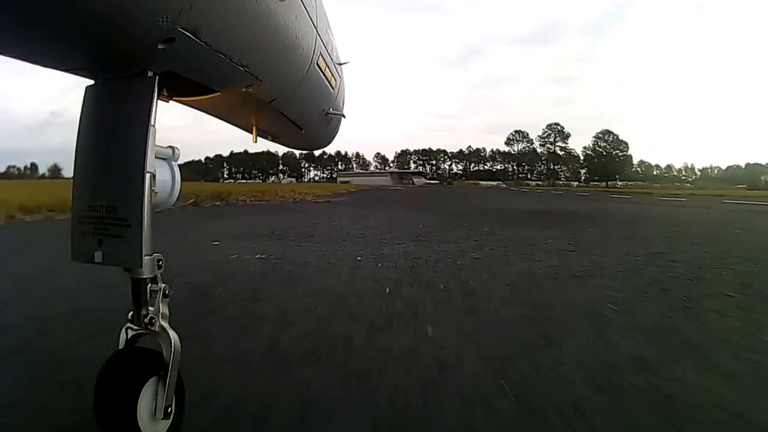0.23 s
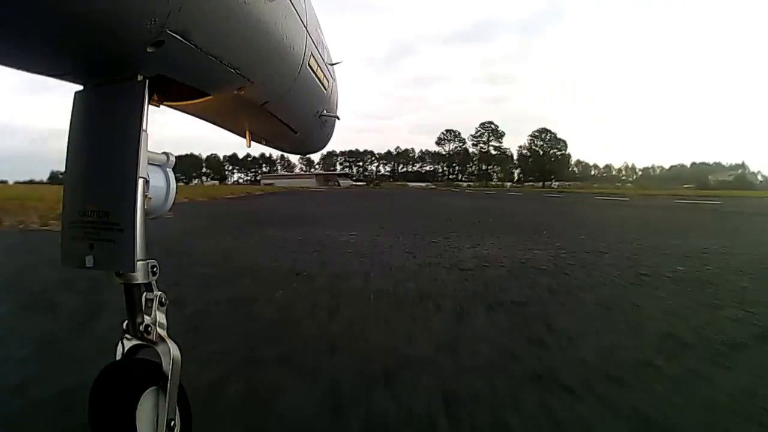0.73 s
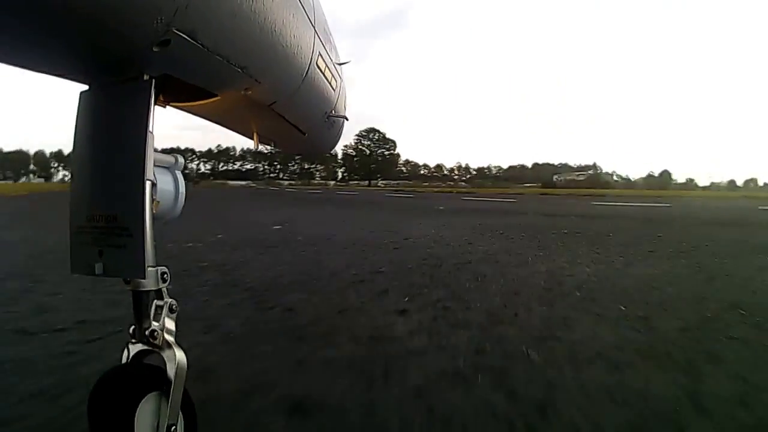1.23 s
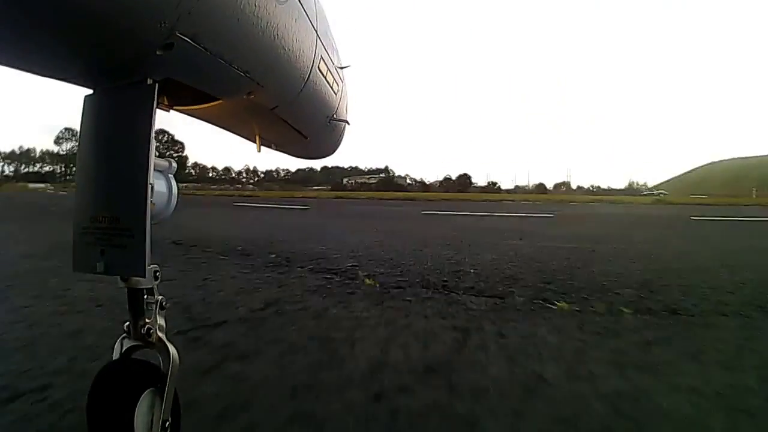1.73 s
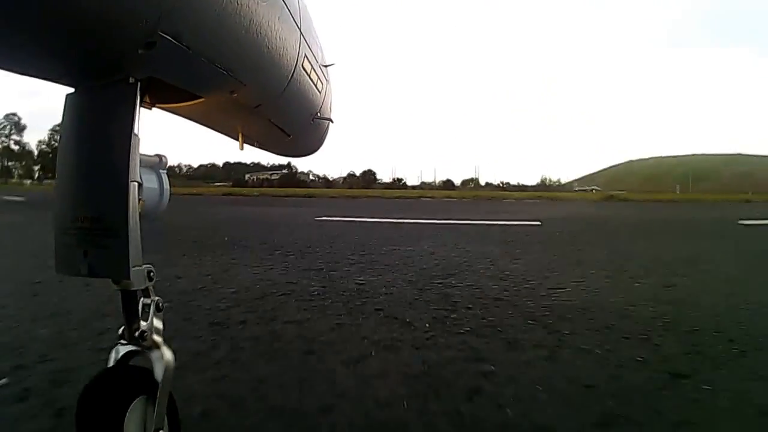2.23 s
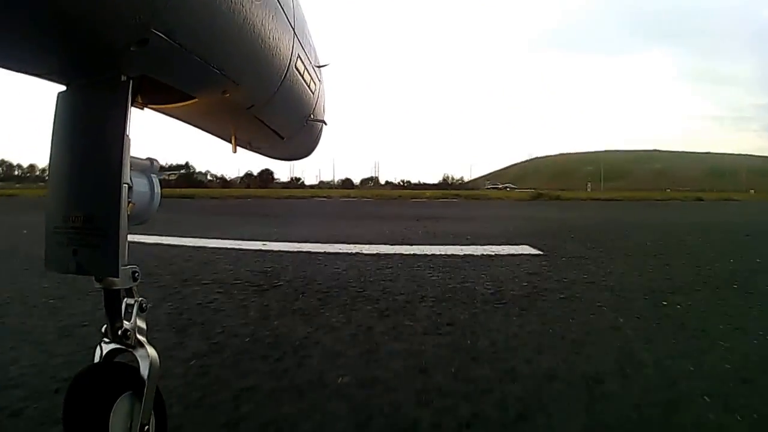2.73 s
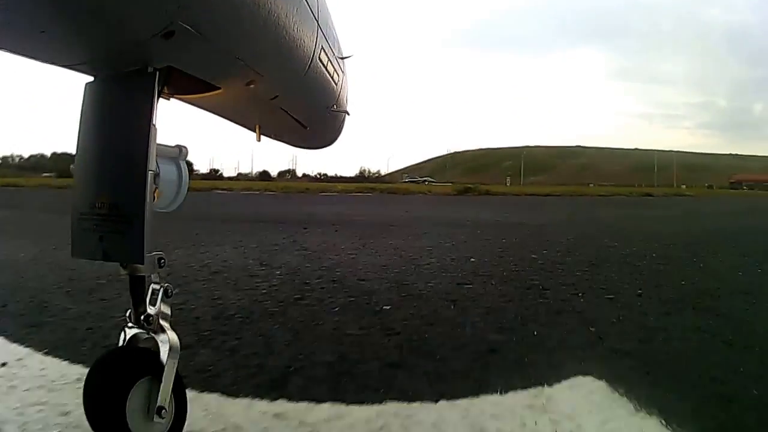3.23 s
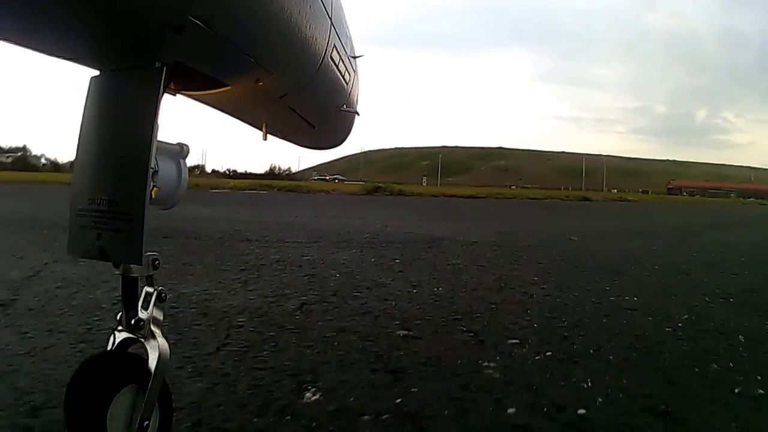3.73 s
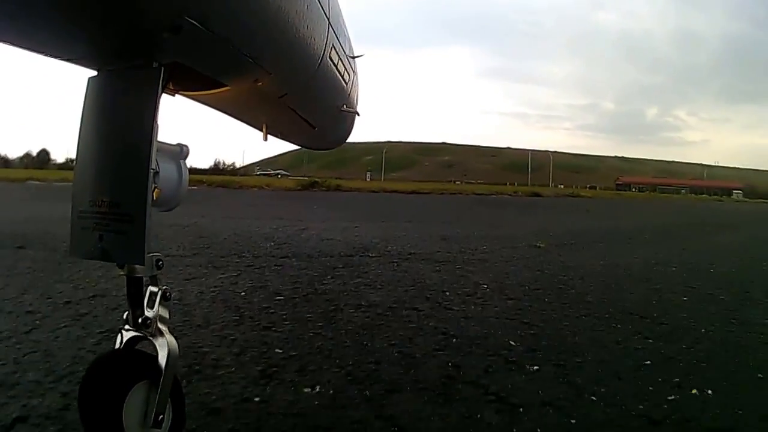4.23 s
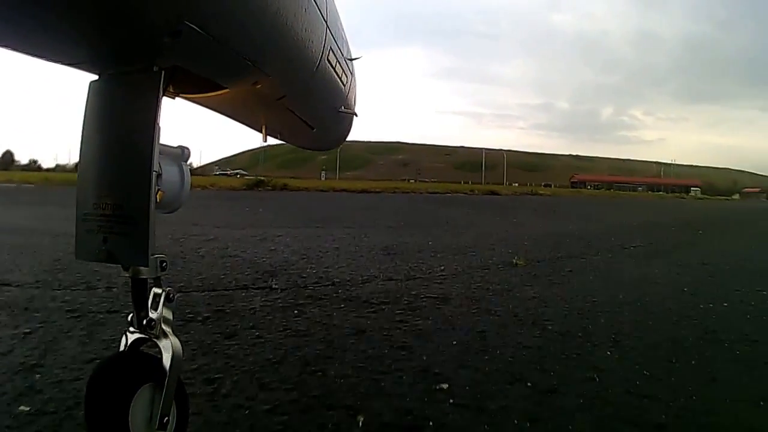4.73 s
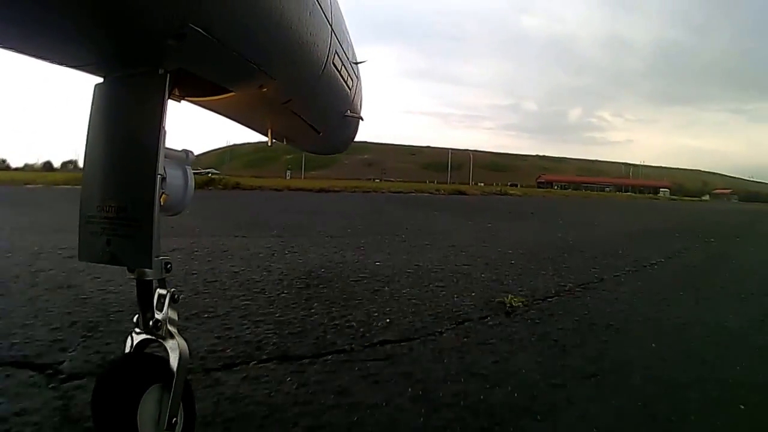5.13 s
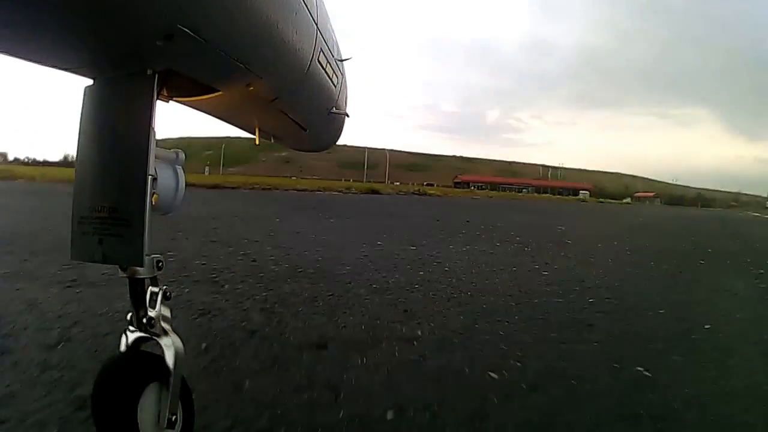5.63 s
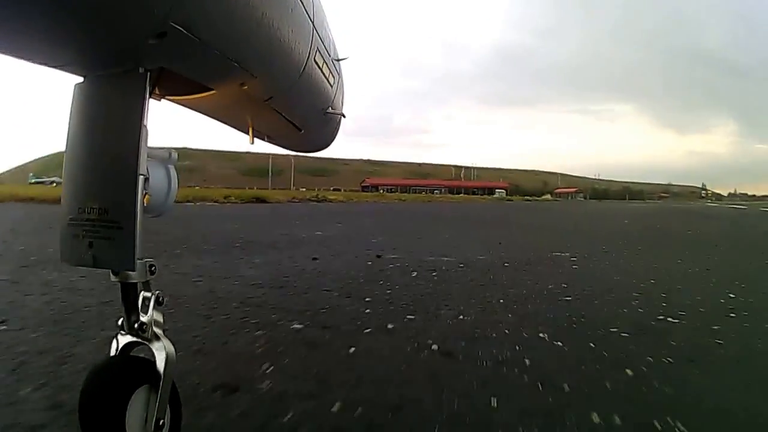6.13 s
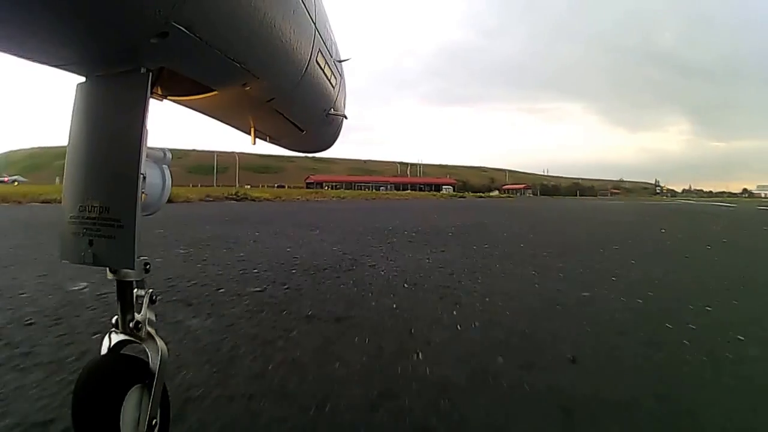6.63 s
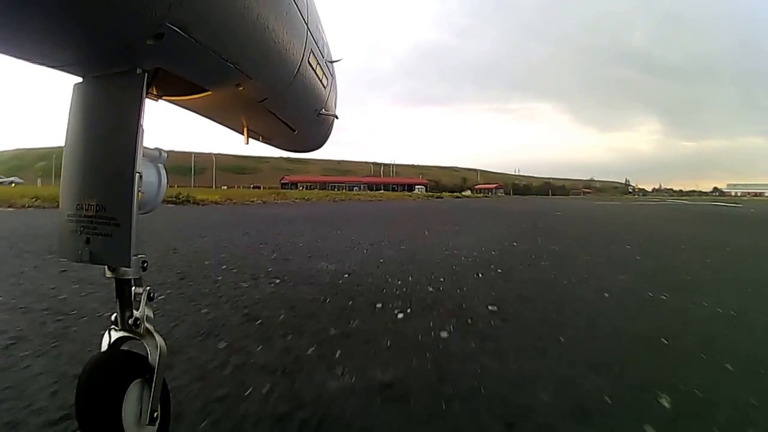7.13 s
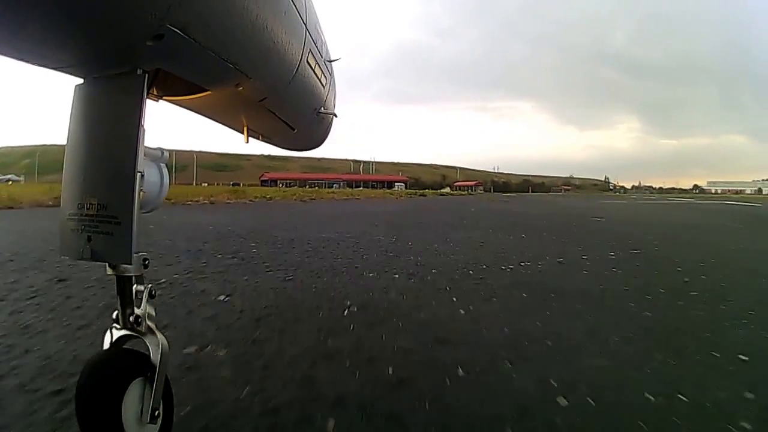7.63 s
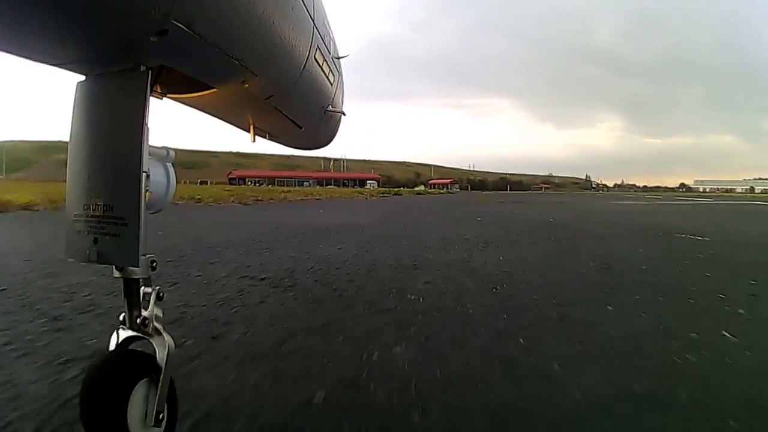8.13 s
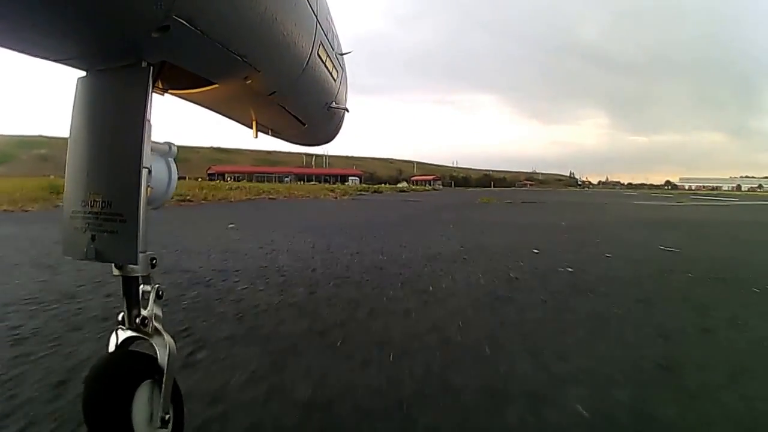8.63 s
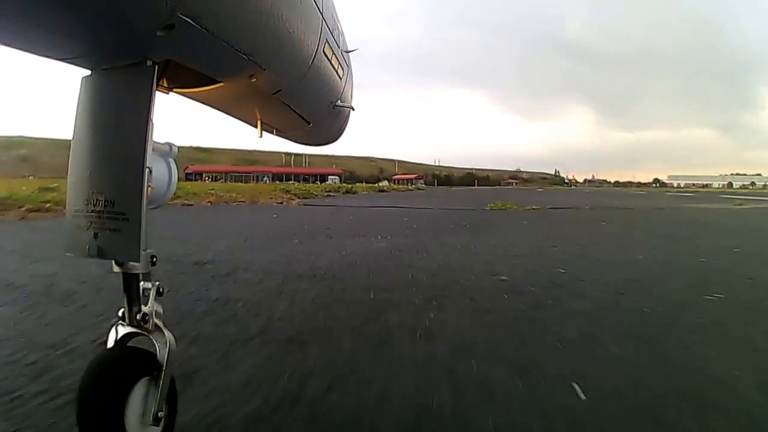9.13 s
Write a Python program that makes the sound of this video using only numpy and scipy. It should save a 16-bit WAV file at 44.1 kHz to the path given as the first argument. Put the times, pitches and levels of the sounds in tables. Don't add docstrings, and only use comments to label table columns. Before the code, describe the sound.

From 0 s a model jet coasts on rough asphalt, heard from a small microphone under its airframe: low tyre drumming, gritty chatter, loose parts chinking, and knocks around 0.5, 0.9, 1.2 and 1.6 s. It weakens after 2 s, then a seam strikes the wheels in a hard cluster at about 2.6 s. Rolling fades to near quiet by 4 s with a few small ticks. At 4.15-4.3 s the motors catch with faint rings and a thud, and two ducted fans jump up in roar, hiss and a shrill whistle near 2.4 kHz. They step higher at 5.2 and 5.8 s, loudest around 6 s, then drop steeply to a faint whine near 6.5 s. From 6.7 s they climb again in steps, settling by 7.8 s into a loud, beating twin whistle with low buffeting until just past 9 s. Sound is dry, muffled above 4 kHz, clipped on peaks.

```python
import sys
import numpy as np
from scipy import signal
from scipy.fft import rfft, irfft, next_fast_len
from scipy.io import wavfile
from scipy.ndimage import map_coordinates

SR = 44100
rng = np.random.default_rng(int(sys.argv[2]) if len(sys.argv) > 2 else 0)


def to_wav(s):
    ch = np.atleast_2d(s).T
    pcm = np.round(np.clip(ch, -1, 1) * 32767)
    wavfile.write(sys.argv[1], SR, pcm.astype(np.int16))


def decibels_to_gain(level_db):
    exponent = np.asarray(level_db, float) / 20
    return 10 ** exponent


N = 413216

# (time [s], shaft speed [Hz])
THROTTLE_SPEED = [(4.2, 80), (4.35, 152), (4.49, 173.5), (5.03, 175), (5.34, 237), (5.74, 237.4),
                  (5.9, 252), (6.235, 251), (6.535, 135), (6.63, 150.5), (6.87, 155.5), (6.98, 166),
                  (7.09, 167.5), (7.28, 189), (7.6, 191), (7.73, 205.5), (8.78, 206.5), (8.95, 212.5)]
# (level at full speed [dB], slope [dB per log speed], start [s], rise [s])
DUCT_LAYERS = [
    (-17, 20, 4.31, .17),
    (-23, 23, 4.27, 0.043),
    (-26, 23.5, 4.27, 0.11),
]


def unit(x):
    return x / np.sqrt(np.mean(x ** 2) + 1e-20)


def curves(rows, before=None):
    times, *columns = np.transpose(rows)
    return [np.interp(np.arange(N) / SR, times, column, left=before) for column in columns]


def wobble(rate):
    knots = rng.standard_normal(int(N * rate / SR) + 4)
    return map_coordinates(knots, [np.arange(N) * rate / SR])


def filtered(x, response):
    m = next_fast_len(N + 8192)
    return irfft(rfft(x, m) * response(np.fft.rfftfreq(m, 1 / SR)), m)[:N]


def rush(spectrum, grain_db=0., rate=300):
    f, db = np.transpose(spectrum)
    lumps = rng.standard_normal(N) * decibels_to_gain(grain_db * wobble(rate))

    def colour(hz):
        return decibels_to_gain(np.interp(np.log(hz + 1), np.log(f), db, -120, -120))

    return unit(filtered(lumps, colour))


def tone(hz):
    return np.sqrt(2) * np.sin(2 * np.pi * np.cumsum(hz) / SR)


def rings(events, attack, rough):
    out = np.zeros(N + SR)
    t = np.arange(SR // 5) / SR
    for start, db, hz, t60 in events:
        envelope = decibels_to_gain(db - 60 * t / t60) * (1 - np.exp(-t / attack))
        out[round(start * SR):][:len(t)] += envelope * np.sin(2 * np.pi * hz * t)
    return out[:N] * (1 - rough + rough * wobble(700))


def lag(x, seconds):
    k = np.exp(-1 / (seconds * SR))
    return signal.lfilter([1 - k], [1, -k], x - x[0]) + x[0]


def law(points, hz):
    f, value = np.transpose(points)
    return np.interp(np.log(hz), np.log(f), value)


def shaft():
    return lag(curves(THROTTLE_SPEED, 70)[0], .05)


def rumble(tyre_db):
    # (frequency [Hz], density [dB/Hz])
    deep_spectrum = [(15, -12.5), (30, -7), (55, -2.5), (85, 1), (120, -4.5), (170, -6), (220, -22)]
    breakaway_hz = 176
    gained = np.cumsum(shaft() ** 2 - breakaway_hz ** 2)
    lowest = gained.argmin()
    index = np.arange(N)
    floor = np.minimum.accumulate(gained) * (index <= lowest) + gained.min() * (index > lowest)
    pace = gained - floor
    buffet = decibels_to_gain(-32 + 15 * np.log(pace / pace.max() + 1e-4))
    rolling = decibels_to_gain(-32 + .45 * tyre_db)
    return np.hypot(rolling, buffet) * decibels_to_gain(4.0 * wobble(11)) * rush(deep_spectrum)


def wheels():
    # (time [s], tyre level [dB])
    roll_level = [(0, -28.5), (.35, -32.5), (.75, -34.5), (1.9, -35.5), (2.2, -41), (2.42, -41),
                  (2.57, -37.5), (2.92, -46), (4, -54), (4.2, -52.5)]
    # (frequency [Hz], density [dB/Hz])
    tyre_spectrum = [(59, -40), (100, -2.5), (204, 0.5), (291, 1.5), (378, 0), (481, 0), (589, -5.5),
                     (680, -1.5), (1000, -21.5), (1300, -36), (2200, -120)]
    grit_spectrum = [(530, -34.5), (900, 0), (985, -7.5), (1200, -4), (1310, -6), (1440, -3), (1610, -7.5),
                     (1780, -3), (2210, -4), (2800, -16), (3640, -45), (6160, -120)]
    rattle_spectrum = [(1530, -30), (2600, -1.5), (3060, -4), (3370, 0.5), (3870, 1), (4070, -7.5),
                       (4200, -15.5), (4300, -28), (5590, -57.5), (9460, -120)]
    # (time [s], peak level [dB], frequency [Hz], t60 [s])
    chinks = [(0.3824, -19.5, 3800, 0.046), (0.4453, -26, 3700, 0.033), (0.4922, -31, 3720, 0.05),
              (0.5925, -35, 3480, 0.056), (0.7212, -32, 3550, 0.045), (0.9167, -28, 3590, 0.093),
              (0.9397, -15.5, 3630, 0.029), (1.0959, -35, 3780, 0.038), (1.3412, -28.5, 3600, 0.054),
              (1.456, -27, 3660, 0.041), (1.6545, -27.5, 3760, 0.057), (1.6694, -33, 3870, 0.05),
              (1.735, -35, 3030, 0.046), (1.9608, -37, 3440, 0.043), (2.3919, -37, 3770, 0.071),
              (2.5675, -39, 3500, 0.063), (3.499, -44, 3780, 0.046), (4.0811, -52, 3790, 0.045)]
    tyre_db, = curves(roll_level)
    jolt = np.abs(wobble(70)) ** 1.82
    tyre = decibels_to_gain(tyre_db + 0.47 * jolt) * rush(tyre_spectrum, 1.3, 60)
    grit = decibels_to_gain(tyre_db - 10.5 + 1.7 * jolt) * rush(grit_spectrum, 0.97, 150)
    rattle = decibels_to_gain(tyre_db - 20.5 + 1.9 * jolt) * rush(rattle_spectrum, 1.9, 120)
    return tyre + grit + rattle + rumble(tyre_db) + rings(chinks, 0.00073, 0.41)


def bumps():
    # (time [s], peak level [dB], crack level [dB])
    impacts = [(0.126, -25, -16), (0.245, -35, -18), (0.541, -13, -11), (0.939, -24, -1), (1.088, -33, -16),
               (1.212, -24, -2), (1.608, -26, -21), (2.439, -32, -1), (2.561, -16, -19), (2.581, -5, -4),
               (2.59, -5, -26), (2.608, -17, -26), (2.623, -17, -10), (2.649, -15.5, -4.5),
               (2.659, -19, -9), (2.908, -28, -5), (3.103, -34.5, 0), (3.498, -30.5, -8), (3.685, -37, 0)]
    # (frequency [Hz], width [Hz], level [dB])
    frame_modes = [(45, 44, 0.5), (90, 86, 3), (211, 220, 2.5), (355, 120, 3.5), (442, 50, 4.5),
                   (860, 43, -0.5)]
    # (frequency [Hz], density [dB/Hz])
    leg_spectrum = [(900, -22), (1250, 7), (1450, -18), (1650, 8), (1900, -6), (2350, 7.5), (2600, -14),
                    (3000, -14), (3600, -11.5), (4200, -32)]
    blows, cracks = np.zeros(N), np.zeros(N + SR)
    t = np.arange(SR // 10) / SR
    crack_t60 = .04
    for start, db, crack_db in impacts:
        blows[round(start * SR)] = decibels_to_gain(db + 31.5)
        decay = decibels_to_gain(db + crack_db - 3.0 - 60 * t / crack_t60)
        cracks[round(start * SR):][:len(t)] += decay * (1 - np.exp(-t / 0.0049))

    def knock(f):
        modes = 0
        for k, (centre, width, db) in enumerate(frame_modes):
            modes = modes + (-1) ** k * decibels_to_gain(db) * 1j * f * width / (centre ** 2 - f ** 2 + 1j * f * width)
        soft_tyre = 1 / (1 + 1j * f / 1100) ** 2
        return modes * soft_tyre

    return filtered(blows, knock) + cracks[:N] * rush(leg_spectrum)


def rotor():
    # (frequency [Hz], level [dB])
    blade_response = [(900, -60), (1460, -40), (1800, -36), (2050, -30.5), (2380, -30), (2520, -42.5),
                      (2800, -26), (3030, -22.5)]
    # (shaft speed [Hz], level [dB])
    imbalance = [(115, -81.5), (174, -54), (190, -39.5), (213, -38), (237, -30), (252, -27.5)]
    # (multiple of shaft speed [1], level at full speed [dB], slope [dB per log speed])
    shaft_orders = [
        (2, -33.5, 19),
        (6, -38, 26.5),
    ]
    blades = 12
    steady = shaft()
    speed = steady * (1 + .0024 * wobble(40))
    blade_db = law(blade_response, blades * steady) + 2.1 * wobble(22) + 3.5 * wobble(9.1)
    lines = decibels_to_gain(blade_db) * tone(blades * speed)
    push_db = 0.0135 * np.abs(np.gradient(steady) * SR)
    shake_db = law(imbalance, steady) + push_db
    lines += decibels_to_gain(shake_db + 1.2 * wobble(6.4)) * tone(speed)
    t = np.arange(N) / SR
    loaded = np.clip((t - DUCT_LAYERS[0][2]) / .4, 0, 1)
    for multiple, db, slope in shaft_orders:
        order_db = db + slope * np.log(speed / speed.max()) + 3.3 * wobble(12)
        lines += loaded * decibels_to_gain(order_db) * tone(multiple * speed)
    running = np.arange(N) > THROTTLE_SPEED[0][0] * SR
    return running * lines


def duct_noise():
    # (frequency [Hz], density [dB/Hz])
    roar_spectrum = [(150, -41), (215, -14), (270, -10), (340, 0), (400, 0), (500, -1.5), (590, -7.5),
                     (650, -15), (700, -24.5), (740, -43.5)]
    rush_spectrum = [(740, -31.5), (800, -7), (860, 2), (910, 1), (1070, -7.5), (1240, -1.5), (1580, -7),
                     (1760, 1), (1950, -2.5), (1990, -34.5)]
    bridge_spectrum = [(1950, 0.0), (2500, 1.5), (2850, -10.0)]
    hiss_spectrum = [(1620, -28), (2750, -4.5), (2950, -9.5), (3160, -10), (3690, -4.5), (3880, -2.5),
                     (4060, -9.5), (4300, -16.5), (5590, -49.5), (9460, -120)]
    wash_spectrum = [(90, -24), (140, -7.5), (210, 0), (300, -4), (600, -1.5), (740, -2.5), (840, -12)]
    t, speed = np.arange(N) / SR, shaft()
    power = np.log(speed / 252)
    levels = []
    for db, slope, start, rise in DUCT_LAYERS:
        onset = np.clip((t - start) / rise, 1e-6, 1) ** 2
        levels.append(db + slope * power + 20 * np.log10(onset))
    roar_db, rush_db, hiss_db = levels
    idle_db = -14 / (1 + (speed / 177) ** 60)
    wash_onset = np.clip((t - DUCT_LAYERS[0][2]) / .35, 1e-6, 1)
    wash_db = -33.5 + 16 * power + idle_db + 20 * np.log10(wash_onset)
    air = decibels_to_gain(roar_db) * rush(roar_spectrum, 1.0, 40)
    air += decibels_to_gain(rush_db + 2.0) * rush(rush_spectrum, 1.4)
    air += decibels_to_gain(rush_db + 1.5) * rush(bridge_spectrum)
    air += decibels_to_gain(hiss_db + 2.0) * rush(hiss_spectrum, 0.97)
    air += decibels_to_gain(wash_db + 7.5) * rush(wash_spectrum)
    return decibels_to_gain(0.43 * wobble(14)) * air


def whistle(hz, db, waver_hz, flutter_db, skirt_db):
    core = decibels_to_gain(flutter_db * wobble(40)) * tone(hz + waver_hz * wobble(45))
    turbulence = filtered(rng.standard_normal(N), lambda f: 1 / (1 + 1j * f / 45) / (1 + 1j * f / 400))
    locked = 1 / (1 + decibels_to_gain(-1.5 * (db + 29.5)))
    skirt = (1 - locked + decibels_to_gain(skirt_db)) * unit(turbulence) * tone(hz)
    return decibels_to_gain(db) * (locked * unit(core) + skirt)


def whistles():
    # (time [s], pitch above [Hz], level above [dB], both [dB])
    second_fan = [(4.45, 95, -12.5, 0), (4.7, 59.5, -9.5, -1.1), (5.24, 51.99, -14, 1.25),
                  (5.36, 42, -9, -3), (5.45, 82, -2.5, -1.85), (5.72, 80.94, 4, 0.7), (5.82, 82.7, 0, -3),
                  (5.88, 77.95, 18, 2.25), (6.14, 96, 16.5, -0.1), (6.37, 83, -3.5, 0.15),
                  (6.56, 79.6, 4.5, -4), (7.25, 58, -4.5, 1), (7.76, 54.77, -5, -0.5), (7.9, 33, 0.2, 0.5),
                  (8.56, 37.99, 0.3, 0.36), (8.63, 63.18, -3.5, -3.5), (8.8, 79.06, -10, .6),
                  (9.1, 83.37, -5.5, -1.12)]
    # (shaft speed [Hz], pitch [Hz])
    first_pitch = [(120, 2340), (150, 2358), (167, 2402), (175, 2426), (190, 2447), (206, 2475),
                   (237, 2521), (252, 2543)]
    # (shaft speed [Hz], level [dB])
    sing_level = [(120, -48), (150, -31), (160, -25.5), (172, -18.5), (190, -14.5), (207, -10.5),
                  (237, -12), (252, -9)]
    late = lag(shaft(), .03)
    above_hz, above_db, both_db = curves(second_fan)
    first_hz = law(first_pitch, late)
    first_db = law(sing_level, late) + both_db - 10 * np.log10(1 + decibels_to_gain(2 * above_db))
    song = whistle(first_hz, first_db + 0.52, 5.064, 0.76, -11.5)
    song += whistle(first_hz + above_hz, first_db + above_db + 1.0, 13, 1.0, -8.5)
    running = np.arange(N) / SR > 4.35
    return running * song


def fans():
    # (time [s], peak level [dB], frequency [Hz], t60 [s])
    kicks = [
        (4.151, -36.5, 1330, 0.065),
        (4.219, -38, 1290, 0.12),
        (4.272, -36.5, 1075, 0.08),
        (4.303, -21.5, 1284, 0.057),
        (4.318, -16.5, 485, 0.1),
    ]
    return whistles() + duct_noise() + rings(kicks, 0.0025, 0.14)


def scene():
    return (wheels() + bumps() + rotor() + fans())[None]


def low_pass(x):
    return signal.sosfilt(signal.butter(12, 15820, fs=SR, output="sos"), x)


def record(dry):
    # (frequency [Hz], level [dB])
    mirrors = [(10600, -69), (12300, -79)]
    overload, top_hz, ceiling = 0.98, 4170, .712
    squeezed = dry[0] / (1 + np.abs(dry[0] / overload) ** 4.6) ** (1 / 3.14)
    band = filtered(squeezed, lambda hz: np.clip((top_hz + 150 - hz) / 300, 0, 1) ** 2)
    t = np.arange(N) / SR
    images = sum(decibels_to_gain(db) * np.cos(2 * np.pi * hz * t) for hz, db in mirrors)
    band = band * (1 + images)
    return low_pass(np.clip(band, -ceiling, ceiling)[None])


dry = scene()
out = record(dry)
to_wav(out)
```